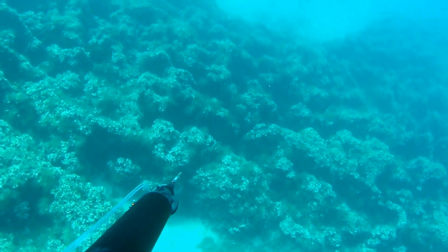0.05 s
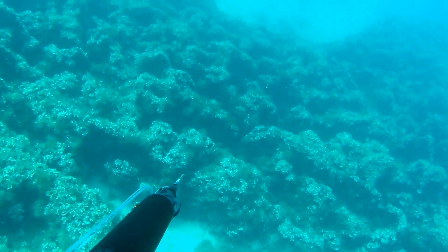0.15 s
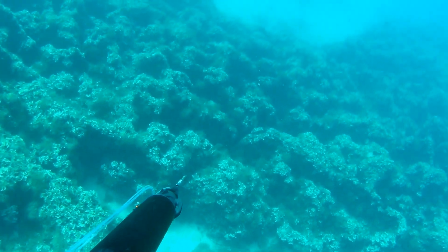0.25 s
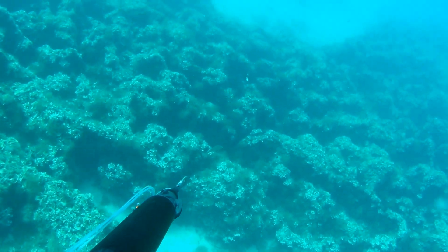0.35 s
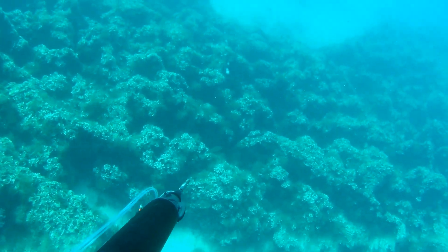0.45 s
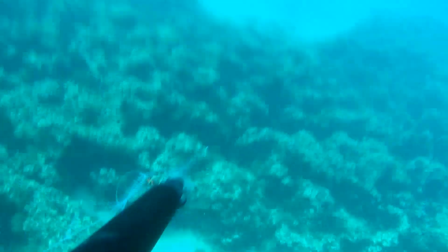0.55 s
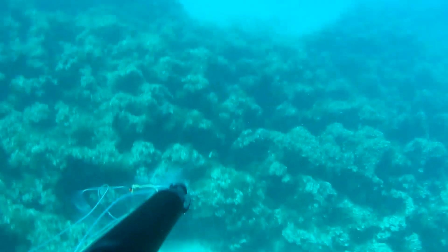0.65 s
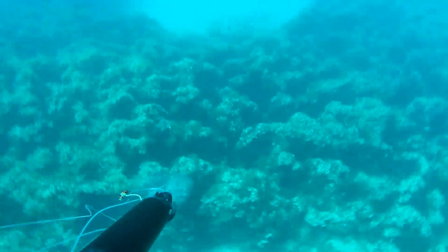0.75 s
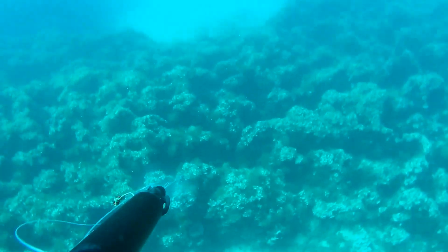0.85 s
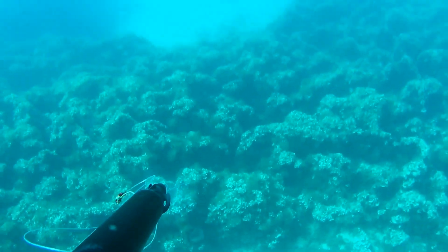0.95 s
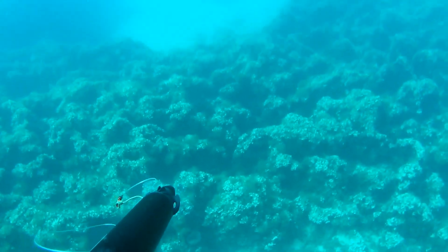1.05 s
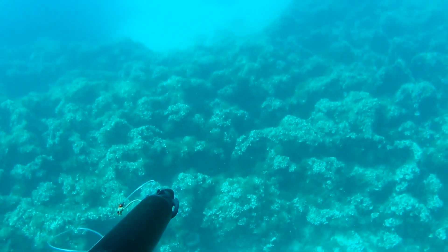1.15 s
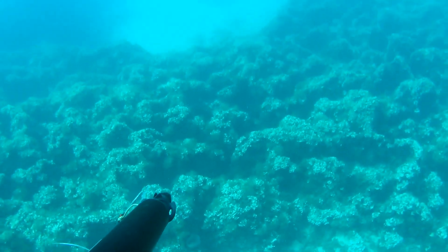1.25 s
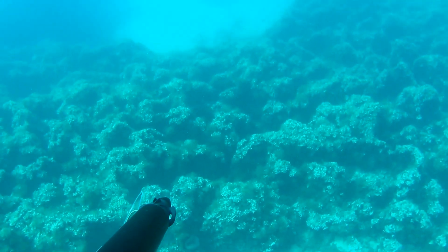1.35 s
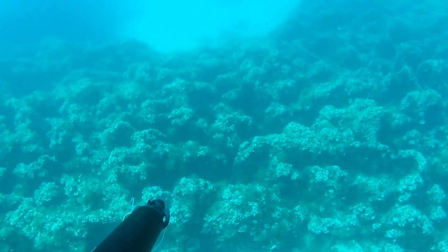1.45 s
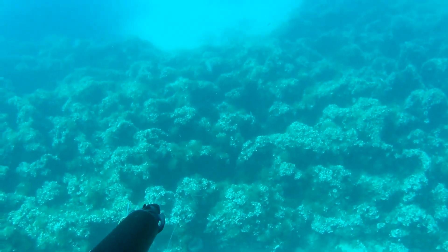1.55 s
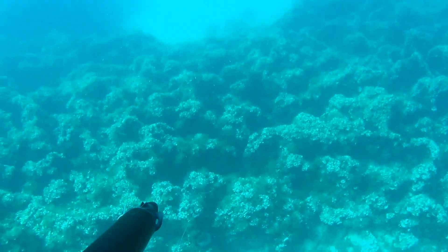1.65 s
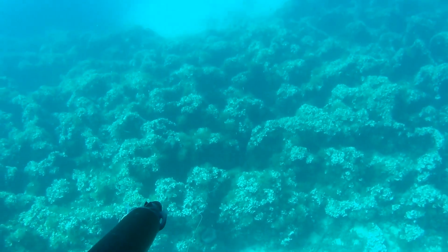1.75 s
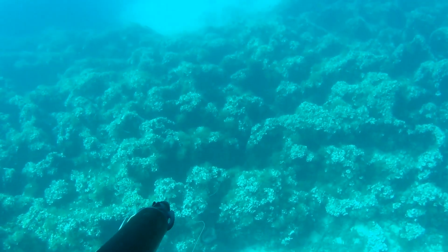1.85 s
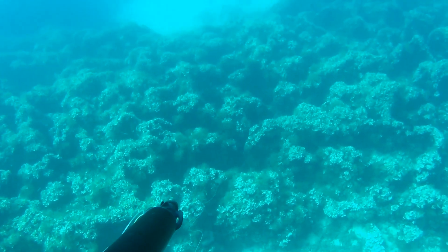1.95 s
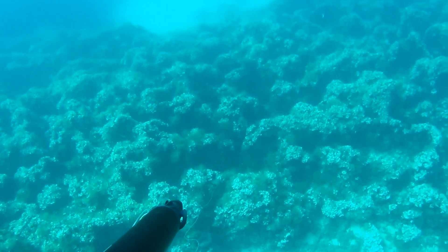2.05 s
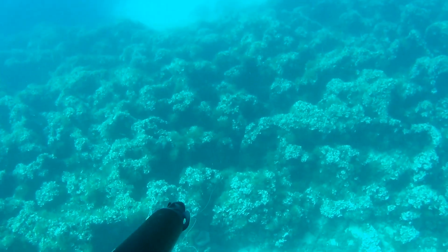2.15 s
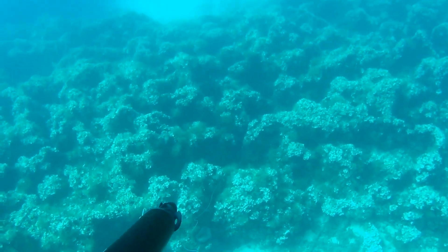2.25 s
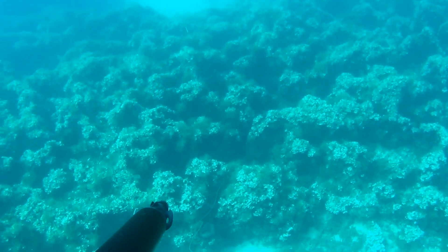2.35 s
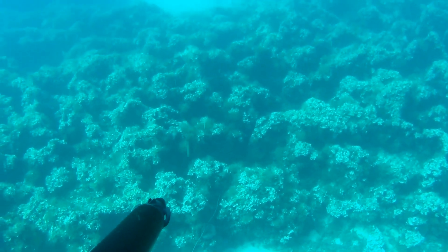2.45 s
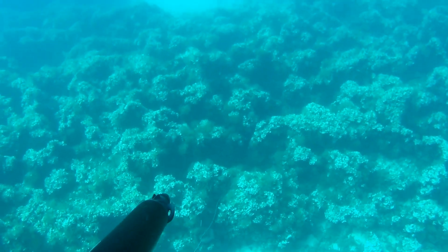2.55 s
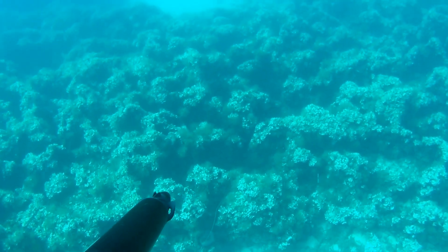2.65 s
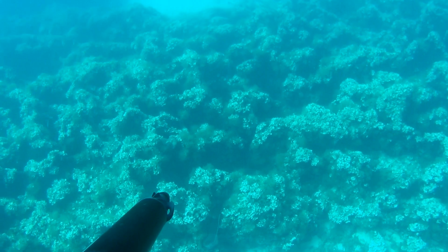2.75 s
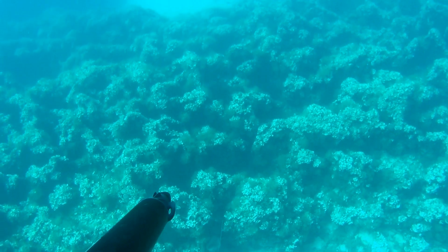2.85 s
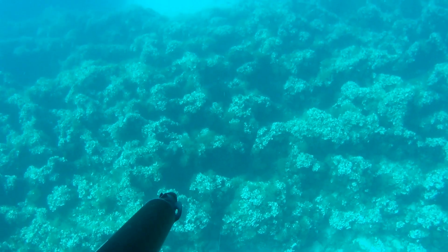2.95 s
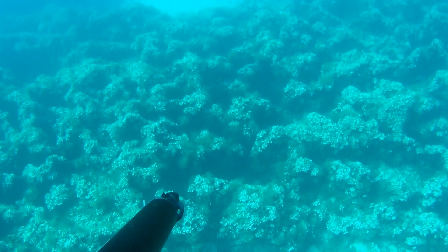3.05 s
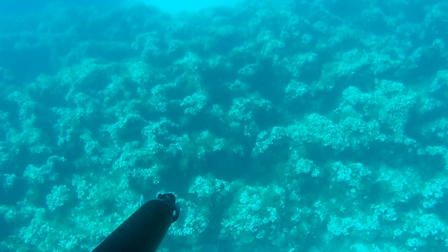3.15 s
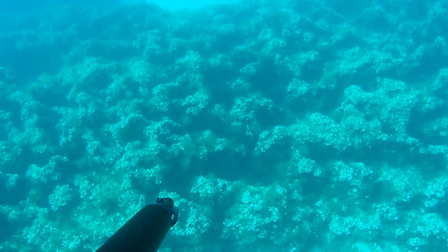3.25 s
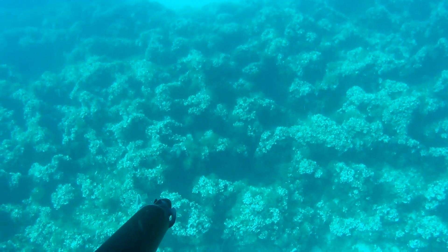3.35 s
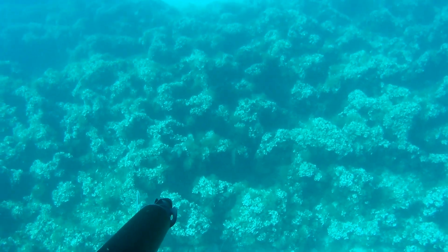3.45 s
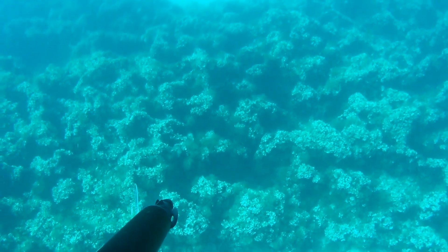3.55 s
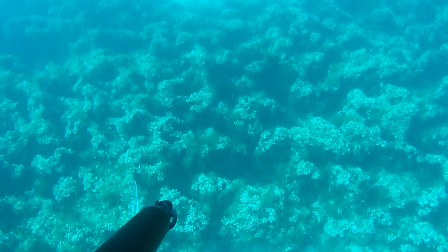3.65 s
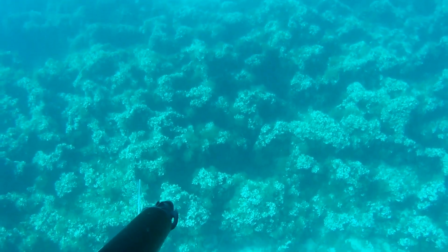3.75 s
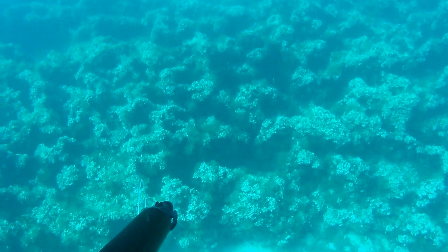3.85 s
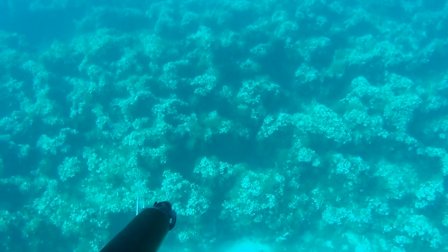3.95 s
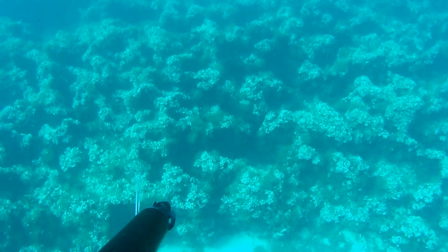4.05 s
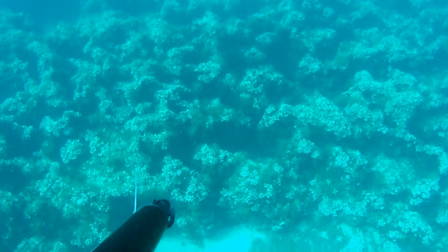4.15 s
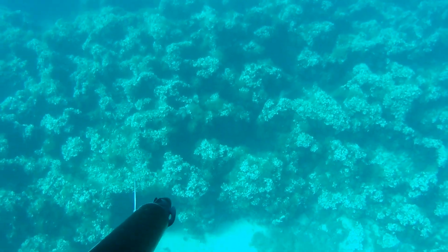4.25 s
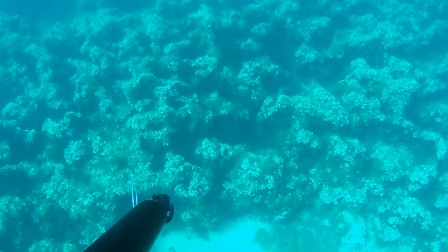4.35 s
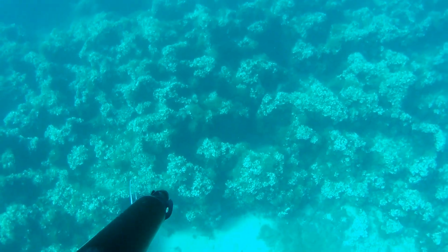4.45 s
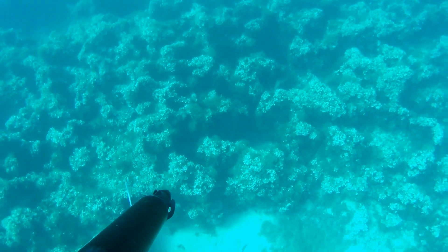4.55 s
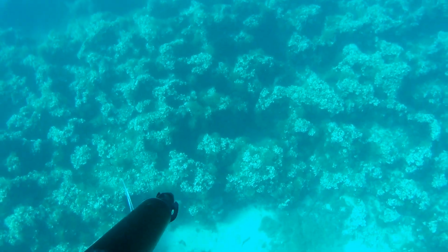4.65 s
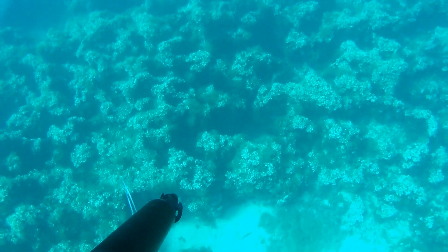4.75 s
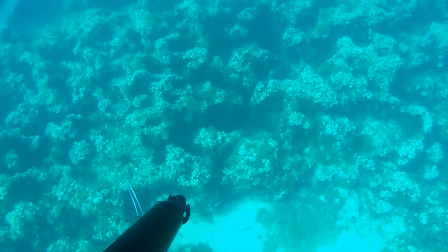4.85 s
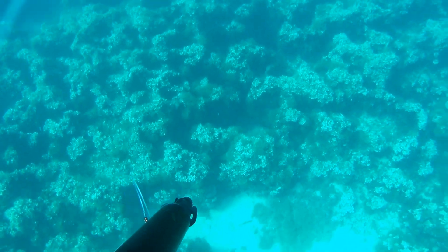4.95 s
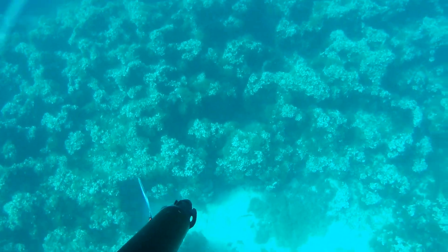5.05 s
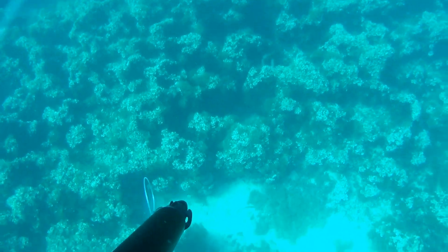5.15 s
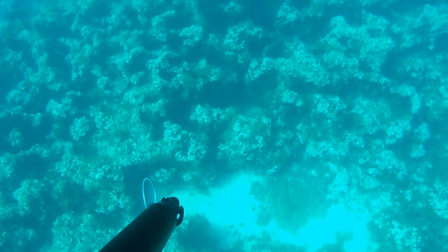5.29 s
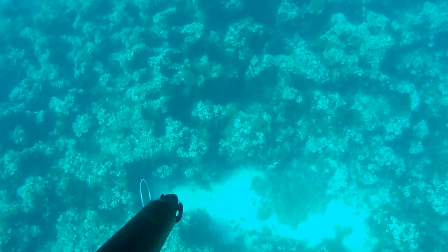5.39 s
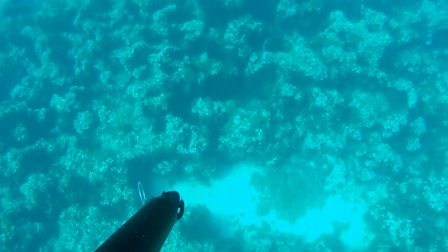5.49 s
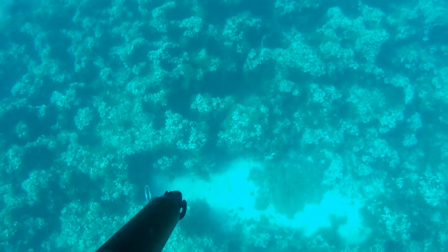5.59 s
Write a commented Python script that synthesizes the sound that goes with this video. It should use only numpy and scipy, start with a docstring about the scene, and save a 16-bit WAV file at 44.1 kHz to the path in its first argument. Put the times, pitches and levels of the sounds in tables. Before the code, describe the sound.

A speargun fires underwater, heard close through the housing of a camera fixed to it. The trigger clacks, and at once the rubber bands slam home with a louder clack, a low shudder and a brief steel ring. The line snaps taut with a smaller clink. After that there is only a quiet wash of water, with scattered shrimp clicks, soft gurgles, small bubbles and a faint thin whine.

```python
"""A speargun fired under water

A band-powered gun is heard through the housing of a camera fixed to it. The trigger clacks, the rubbers
shake the barrel and slam home, the steel rings in its natural modes, and the line snaps taut.
Around it are a low wash of moving water, gurgles, bubbles, snapping shrimp and a faint thin whine."""
import sys
import numpy as np
from scipy import signal
from scipy.fft import rfft, irfft
from scipy.io import wavfile
from scipy.ndimage import uniform_filter1d

SR = 44100
rng = np.random.default_rng(int(sys.argv[2]) if len(sys.argv) > 2 else 0)


def inscribe(sig):
    """Save sig as 16-bit PCM at rate SR to the path in sys.argv[1].

    A 1-D sig is mono; a 2-D sig holds one channel per row.
    Samples are clipped to [-1, 1] before scaling.
    """
    pcm = np.round(np.clip(np.atleast_2d(sig).T, -1, 1) * 32767)
    wavfile.write(sys.argv[1], SR, pcm.astype(np.int16))


N = 247842
TIME = np.arange(N) / SR

# The bright edge of a blow on steel. Each row: frequency in Hz, relative spectral density in dB.
STEEL_CRACK = [(500, -14.5), (2000, -3), (3200, 2.5), (4500, 0.5), (7000, -6), (8200, -8), (11000, -19.5)]


def gain_of(db):
    """Amplitude grows tenfold for every 20 dB."""
    return 10 ** (np.asarray(db) / 20)


def unit_rms(x):
    """Normalisation to a mean power of 1."""
    return x / np.sqrt(np.mean(x ** 2) + 1e-20)


def level_at(spectrum, hz):
    """Interpolation of a spectrum on a logarithmic frequency axis."""
    row_hz, row_db = np.transpose(spectrum)
    return np.interp(np.log(hz + 1), np.log(row_hz + 1), row_db)


def add(mix, start_s, sound):
    """Superposition: a stereo sound joins the mix at its start time."""
    part = mix[:, round(start_s * SR):][:, :sound.shape[1]]
    part += sound[:, :part.shape[1]]


def drift(rate_hz):
    """Low-passed noise gives a slow random fluctuation of rms 1."""
    lowpass = np.exp(-(np.fft.rfftfreq(N, 1 / SR) / rate_hz) ** 2)
    return unit_rms(irfft(rfft(rng.standard_normal(N)) * lowpass, N))


def noise(colour_db):
    """Spectral shaping: white noise takes on a colour given as a function of frequency; rms 1."""
    response = gain_of(colour_db(np.fft.rfftfreq(N, 1 / SR)))
    return unit_rms(irfft(rfft(rng.standard_normal(N)) * response, N))


def mic_phases(hz):
    """Phase difference: the housing wall moves the two microphones out of step."""
    # The wall's stereo spread. Each row: frequency in Hz, side level over mid level in dB.
    spread = [(60, -11), (110, -9.5), (190, 2), (330, -2), (700, 4), (1300, -3.5), (2200, 0.5), (6000, -4),
              (11000, -10.5)]
    return np.exp(1j * np.array([[-1], [1]]) * np.arctan(gain_of(level_at(spread, hz))))


def surges(rows, rise_s, t60):
    """Envelopes add in power: each climbs 60 dB in rise_s, holds, and decays exponentially."""
    power = np.zeros(N)
    for start, db, hold in rows:
        fall = np.maximum(start - TIME, 0) / rise_s + np.maximum(TIME - start - hold, 0) / t60
        power += gain_of(db - 60 * fall) ** 2
    return np.sqrt(power)


def burst(colour_db, t60, diffuse=0.082, size=8192):
    """Source and filter: a dying scatter of pressure pulses is coloured by a body; energy 1 a channel."""
    t, hz = np.arange(size) / SR, np.fft.rfftfreq(size, 1 / SR)
    pulses = rfft(rng.standard_normal((2, size)) * gain_of(-60 * t / t60))
    # Whitening the blow leaves the colour to the struck body.
    power = uniform_filter1d(abs(pulses) ** 2, max(3, round(3 * size / SR / t60)))
    direct, scattered = pulses / np.sqrt(abs(power) + 1e-20)
    phases = mic_phases(hz)
    blow = irfft(direct * phases + diffuse * scattered * phases[::-1]) * (t < t[-1] / 2)
    log_gain = np.log(gain_of(np.maximum(colour_db(hz), -90)))
    mirrored = np.r_[log_gain, log_gain[-2:0:-1]]
    minimum_phase = np.exp(np.conj(signal.hilbert(mirrored)))[:len(hz)]
    pair = irfft(minimum_phase * rfft(blow))
    return pair / np.linalg.norm(pair, axis=1, keepdims=True)


def tick(spectrum, t60):
    """A brief impulse spreads over a broad band; its peak is about 1."""
    sound = burst(lambda hz: level_at(spectrum, hz), t60)
    return sound / abs(sound).max(1).mean()


def knock(pitch, q, t60, muffle=1.01):
    """Heavy damping leaves one broad resonance, heard as a dull thud."""
    def colour_db(hz):
        ratio = (hz + 1) / pitch
        resonance_loss = 1 + (q * (ratio - 1 / ratio)) ** 2
        treble_loss = 1 + (ratio / muffle) ** 3
        return -10 * np.log10(resonance_loss * treble_loss)
    return burst(colour_db, t60, diffuse=.45)


def partial(hz, t):
    """A mode vibrates as a sinusoid of random phase, picked up by both microphones."""
    return (mic_phases(hz) * np.exp(2j * np.pi * (hz * t + rng.random()))).real


def ring(modes, rise_s):
    """Free vibration: each mode of a struck part decays at its own rate."""
    t = TIME[:SR]
    sound = sum(partial(hz, t) * gain_of(db - 60 * t / t60) for hz, db, t60 in modes)
    return sound * (1 - np.exp(-t / rise_s))


def ping(hz, cycles):
    """A bubble or small part is a damped oscillator, falling to 1/e in the given cycles."""
    t = TIME[:SR // 5]
    tone = (mic_phases(hz) * np.exp(2j * np.pi * hz * t)).imag
    return tone * np.exp(-hz * t / cycles) * (1 - np.exp(-hz * t))


def scatter(sound, per_s, spread_db):
    """A Poisson process: one sound recurs at random moments and strengths."""
    sizes = gain_of(spread_db * np.minimum(rng.exponential(1, N), 3))
    impulses = sizes * (rng.random(N) < per_s / SR)
    return signal.oaconvolve(impulses[None], sound, axes=1)[:, :N]


def swarm(low_hz, high_hz, cycles, per_s, spread_db, count=24):
    """Bubbles of many sizes resonate independently, each at the pitch of its size; rms 1."""
    pitches = np.geomspace(low_hz, high_hz, count)
    return unit_rms(sum(scatter(ping(hz, cycles), per_s / count, spread_db) for hz in pitches))


def wash(mid_db=-60.5, side_db=-60, flicker_db=1.5):
    """The broadband noise of open water is filtered by the resonances of the housing."""
    # Water noise in phase (mid) and in antiphase (side) at the microphones.
    # Each row: frequency in Hz, relative spectral density in dB.
    mid_colour = [(15, -31), (25, 0.5), (104, 3), (141, -6), (218, -3.5), (311, -8.5), (518, -14),
                  (721, -19.5), (840, -19), (1300, -18.5), (1670, -14), (2000, -23.5), (4750, -27),
                  (6440, -27.5), (11000, -31.5), (14300, -69.5), (22000, -120)]
    side_colour = [(15, -29.5), (25, -9.5), (54, 0), (152, -9.5), (197, 2), (241, -13.5), (362, -7.5),
                   (619, -8), (862, -11.5), (1670, -17.5), (3680, -27.5), (5390, -27.5), (11000, -39.5),
                   (14300, -73), (22000, -120)]
    # Housing resonances. Each row: frequency in Hz, width in Hz, boost in dB.
    housing = [(722, 90, 5), (1647, 200, 3), (2296, 120, 9), (5400, 480, 4), (7960, 440, 3)]

    def housing_db(hz):
        return sum(db / (1 + (2 * (hz - centre) / width) ** 2) for centre, width, db in housing)
    mid = gain_of(mid_db) * noise(lambda hz: level_at(mid_colour, hz) + housing_db(hz))
    side = gain_of(side_db) * noise(lambda hz: level_at(side_colour, hz))
    pair = np.array([mid + side, mid - side])
    body = signal.sosfiltfilt(signal.butter(2, 2500, fs=SR, output="sos"), pair)
    hiss = pair - body
    return hiss + body * gain_of(flicker_db * drift(39.8))


def whine(steady_db=-77, swell_db=-73, peak_s=3.91, half_s=0.61, waver=0.00076, flutter_db=2.5):
    """Slight frequency and amplitude modulation roughen a thin whine that swells once."""
    # The whine's tones. Each row: frequency in Hz, relative level in dB.
    tones = [(1698, -1.5), (1150, -12.5)]
    wavering_time = np.cumsum(1 + waver * drift(25)) / SR
    tone = sum(gain_of(db) * np.sin(2 * np.pi * hz * wavering_time) for hz, db in tones)
    swell = gain_of(swell_db) * np.exp(-((TIME - peak_s) / half_s) ** 2)
    return unit_rms(tone) * (gain_of(steady_db) + swell) * gain_of(flutter_db * drift(26))


def gurgles(slosh_db=-68, glugs_per_s=160, pitch_ratio=1.11, glug_cycles=2.6):
    """Pockets of water sliding round the gun resonate in clusters of low glugs over a growing slosh."""
    # Gurgles against the gun. Each row: centre in seconds, level in dB, pitch in Hz,
    # nominal half length in seconds.
    clusters = [(0.899, -49.5, 101.4, 0.021), (1.886, -60, 350, .054), (2.664, -55, 60.2, .013),
                (2.825, -60, 255, .11), (3.646, -59.5, 270, .054), (4.447, -61.5, 125.7, .15),
                (4.547, -53, 251, .1), (4.759, -59, 514, 0.083), (5.324, -56.5, 190, .1),
                (5.495, -54, 100, 0.16), (5.522, -50, 272, 0.081)]
    slosh = swarm(low_hz=196, high_hz=350, cycles=2.5, per_s=65, spread_db=1, count=8)
    out = gain_of(slosh_db) * slosh * TIME / TIME[-1]
    for centre, db, pitch, half in clusters:
        cluster = np.zeros((2, SR))
        reach_s = 1.5 * half
        count = 2 + int(2 * half * glugs_per_s)
        for early, late, size, detune in rng.random((64, 4))[:count]:
            glug = (.5 + size) * ping(pitch * pitch_ratio ** (4 * detune - 2), glug_cycles)
            add(cluster, reach_s * (early + late), glug)  # densest at the centre
        add(out, centre - reach_s, gain_of(db) * np.sqrt(reach_s) * unit_rms(cluster))
    return out


def bubbles(fizz_db=-77, growth_db=12.5, growth_span_s=(1.7, 5.4)):
    """Bubble resonance: small bubbles make a growing fizz, and a few larger ones stand out."""
    # Single bubbles. Each row: start in seconds, level in dB, pitch in Hz.
    blips = [(1.256, -52.5, 927), (1.573, -46.5, 1190), (2.554, -53, 1800), (2.775, -49.5, 1600),
             (3.088, -47, 1643), (3.22, -47, 1660), (3.633, -43, 1870), (4.489, -46.5, 1700),
             (5.409, -43.5, 1620), (5.481, -42, 1457)]
    fizz = swarm(low_hz=690, high_hz=2500, cycles=2.0, per_s=170, spread_db=1.47)
    out = fizz * gain_of(fizz_db + growth_db * np.interp(TIME, growth_span_s, [0, 1]))
    for start, db, hz in blips:
        add(out, start, gain_of(db) * ping(hz, cycles=6.4))
    return out


def shrimp(crack_gain_db=1.5, body_gain_db=8.5, crack_t60=0.0043, body_t60=.014, lag_s=0.0004,
           far_db=-63, far_per_s=42, far_timbres=10):
    """Impulse excitation: near snaps tap the housing one by one; far ones make a sparse crackle."""
    # Near snaps. Each row: start in seconds before the lag, relative crack and body levels in dB.
    snaps = [(.1785, -52, -71), (0.9666, -59, -51), (1.0152, -41.5, -62), (1.0766, -51, -57.5),
             (1.4848, -45.5, -70), (1.5282, -44, -53), (1.607, -48, -64), (1.674, -43.5, -55.5),
             (2.2473, -42, -57), (2.2797, -43.5, -58.5), (2.4711, -41, -51.5), (2.9588, -63.5, -49.5),
             (3.0765, -49, -59.5), (3.3504, -48, -56), (3.6778, -43.5, -49), (3.7626, -43.5, -54),
             (3.9694, -51.5, -65), (4.1477, -46.5, -61), (4.7089, -44.5, -52), (5.1452, -46.5, -63),
             (5.239, -50.5, -60)]
    # The two parts of a snap. Each row: frequency in Hz, relative spectral density in dB.
    crack_colour = [(300, -32.5), (1500, -9.5), (3000, -5), (4500, -4), (5500, 5), (6700, 6), (7500, -6),
                    (8200, -11), (11000, -16)]
    body_colour = [(200, -19), (700, -12.5), (1200, -3.5), (1650, 5), (2100, -6), (2800, -3), (4200, -18.5),
                   (9000, -38.5)]
    out = np.zeros((2, N))
    for start, crack_db, body_db in snaps:
        add(out, start + lag_s, gain_of(crack_db + crack_gain_db) * tick(crack_colour, crack_t60))
        add(out, start + lag_s, gain_of(body_db + body_gain_db) * tick(body_colour, body_t60))
    for _ in range(far_timbres):
        far_snap = tick(crack_colour, crack_t60) + rng.random() * tick(body_colour, body_t60)
        out += gain_of(far_db) * scatter(far_snap, far_per_s / far_timbres, spread_db=5.0)
    return out


def churn(side_db=-5):
    """Turbulence along the barrel makes a low noise that decays after the shot."""
    # Turbulent water. Each row: frequency in Hz, relative spectral density in dB.
    colour = [(20, -6.5), (45, 1), (130, 2), (400, -10), (700, -24.5), (1400, -27), (2300, -35.5),
              (3200, -48), (7000, -55), (11000, -73)]
    # Eddies of the shot, then the line. Each row: time in seconds, relative level in dB, hold in seconds.
    eddies = [(.468, -19, 0.07), (.69, -37.5, 0.014)]
    mid = noise(lambda hz: level_at(colour, hz))
    side = gain_of(side_db) * noise(lambda hz: level_at(colour, hz))
    return unit_rms(np.array([mid + side, mid - side])) * surges(eddies, rise_s=0.087, t60=0.29)


def line(knock_db=2, squeak_hz=6620):
    """Sudden tension: the line snaps taut, jolts its steel fitting and squeaks as it slips through."""
    # Tugs on the fitting. Each row: start in seconds, relative level in dB, crack peak in dB.
    tugs = [(0.7102, -46, -43), (0.7146, -27.5, -38), (0.7162, -18, -40.5), (.7270, -33, -47),
            (0.7408, -36, -64), (0.7652, -46.5, -56)]
    # The fitting's modes. Each row: frequency in Hz, relative level in dB, t60 in seconds.
    modes = [(747, -13, 0.046), (950, -17, 0.072), (1234, -8, 0.022), (1360, -16, 0.046), (1605, -2, 0.026),
             (2120, -22, 0.041), (2940, -23, 0.019), (5400, -25, 0.017), (6530, -16, 0.0068)]
    # Slips of the line. Each row: start in seconds, level in dB.
    squeaks = [(0.714, -46.5), (.74, -56)]
    out = np.zeros((2, N))
    for start, db, crack_db in tugs:
        add(out, start, gain_of(db) * ring(modes, rise_s=0.00023))
        add(out, start, gain_of(db + knock_db) * knock(pitch=990, q=0.81, t60=.028))
        add(out, start, gain_of(crack_db) * tick(STEEL_CRACK, t60=.012))
    for start, db in squeaks:
        add(out, start, gain_of(db) * ping(squeak_hz, cycles=36))
    return out


def trigger(release_s=.4318, ring_db=-13, knock_db=-2, tick_db=-37, lead_s=.0017):
    """Sudden release: the latch lets the shaft go with a tick, then a thud and a short hollow ring."""
    # The trigger's modes. Each row: frequency in Hz, relative level in dB, t60 in seconds.
    modes = [(185, -3, .058), (655.7, -0.5, .06), (839.6, -6.5, .057), (2287, -16, 0.013)]
    # The latch's tick. Each row: frequency in Hz, relative spectral density in dB.
    latch_colour = [(2000, -3), (6800, -4), (8200, 3), (11000, -7)]
    out = np.zeros((2, N))
    add(out, release_s, gain_of(ring_db) * ring(modes, rise_s=0.00066))
    add(out, release_s, gain_of(knock_db) * knock(pitch=600, q=1.4, t60=.035))
    add(out, release_s - lead_s, gain_of(tick_db) * tick(latch_colour, t60=.01))
    return out


def recoil(wobble=.02):
    """Flexural vibration: the contracting rubbers shake the barrel at its low bending tones."""
    # Bending modes. Each row: frequency in Hz, relative level in dB.
    modes = [(104, -3), (63.16, -12.5), (178.9, -11.5), (216.2, -10.5)]
    # Release, pull and rebound. Each row: time in seconds, relative level in dB, hold in seconds.
    kicks = [(.441, -26.5, .01), (.459, -13, 0.031), (.512, -11, .026)]
    wavering_time = np.cumsum(1 + wobble * drift(40)) / SR
    shake = sum(gain_of(db) * partial(hz, wavering_time) for hz, db in modes)
    return unit_rms(shake) * surges(kicks, rise_s=.025, t60=.055)


def ringing(slam_s=.502, ring_db=-16):
    """Modal decay: the slam of the rubbers leaves the steel shaft and the barrel ringing."""
    # Modes of shaft and barrel. Each row: frequency in Hz, relative level in dB, t60 in seconds.
    modes = [(61.4, -5.5, .54), (115.5, -4, .4), (181.8, 0.5, .3), (194.5, -5.5, .38), (257, -6, 0.63),
             (325, -10, .68), (410, -17, .42), (598, -20.5, 0.6), (921, -14.5, 0.62), (1073, -12.5, .38),
             (1233, -23.5, .27), (1516, -10, .26), (1567, -17, .22), (1795, -7, 0.25), (2013, -22, .19),
             (2116, -22, .19), (2236, -24.5, .25), (4070, -22.5, .16), (6600, -41, .25)]
    out = np.zeros((2, N))
    add(out, slam_s, gain_of(ring_db) * ring(modes, rise_s=.028))
    return out


def clacks(knock_gain=15.3, clank_db=-3):
    """Impact: each blow is a dull knock with a dry crack; heavy, sharp ones make the barrel clank."""
    # Blows of rubbers and shaft on the barrel. Each row: start in seconds, relative knock level in dB,
    # knock pitch in Hz, knock t60 in seconds, crack peak in dB.
    blows = [(0.421, -35, 680, .063, -65), (0.457, -15.5, 344.2, .04, -45.5), (.469, -13, 282, .034, -52),
             (0.4771, -21, 700, .022, -30), (0.4903, -29.5, 705, .02, -29), (0.4973, -22, 900, .016, -33),
             (.501, -7, 553, .026, -19.5), (0.5022, -13.5, 1400, .022, -18), (0.5083, -9.5, 560, .023, -28),
             (.514, -23, 376, .05, -35.5), (.5445, -28, 1200, .035, -34),
             (0.5497, -14.5, 322.3, 0.025, -48.5), (0.5503, -28.5, 1388, .03, -53.5),
             (0.618, -46, 1510, .03, -42.5), (.639, -30, 400, .055, -52), (0.642, -44, 1510, .05, -59)]
    # The barrel's short-lived modes. Each row: frequency in Hz, relative level in dB, t60 in seconds.
    clank_modes = [(475, -2.5, 0.17), (640, 2.5, 0.069), (832, -5, .06), (1042, -8, .07), (1300, -4, .055),
                   (2700, -18.5, .04), (3100, -17.5, .04)]
    out = np.zeros((2, N))
    for start, knock_db, pitch, t60, crack_db in blows:
        add(out, start, knock_gain * gain_of(knock_db) * knock(pitch, q=1.9, t60=t60))
        add(out, start, gain_of(crack_db) * tick(STEEL_CRACK, t60=.009))
        hardness_db = (knock_db + crack_db) / 2
        add(out, start, gain_of(clank_db + hardness_db) * ring(clank_modes, rise_s=0.00036))
    return out


def scene(left_db=-2, right_db=1.5):
    """The sources superpose; a level difference leans the gun's low shudder to the right."""
    shudder = (recoil() + churn()) * gain_of([[left_db], [right_db]])
    shot = shudder + trigger() + clacks() + ringing() + line()
    return shot + shrimp() + bubbles() + gurgles() + wash() + whine()


def record(dry, cutoff_hz=11200):
    """Soft saturation rounds the loudest peaks, then a low-pass filter limits the band."""
    lowpass = signal.firwin(301, cutoff_hz, window=("kaiser", 8), fs=SR)
    return signal.oaconvolve(np.tanh(dry), lowpass[None], "same")


dry = scene()
out = record(dry)
inscribe(out)
```